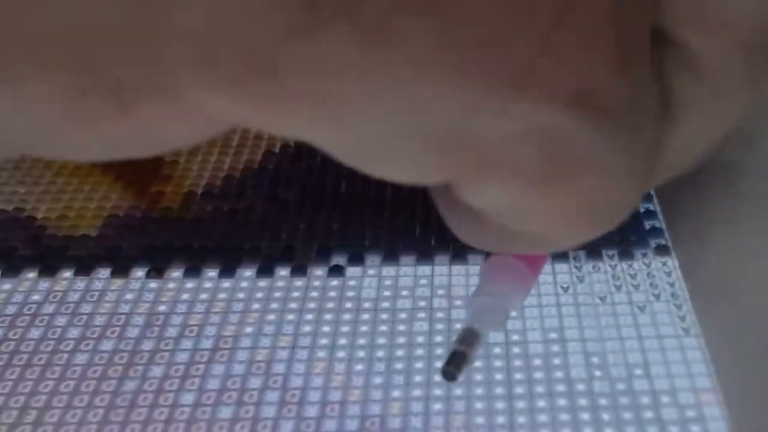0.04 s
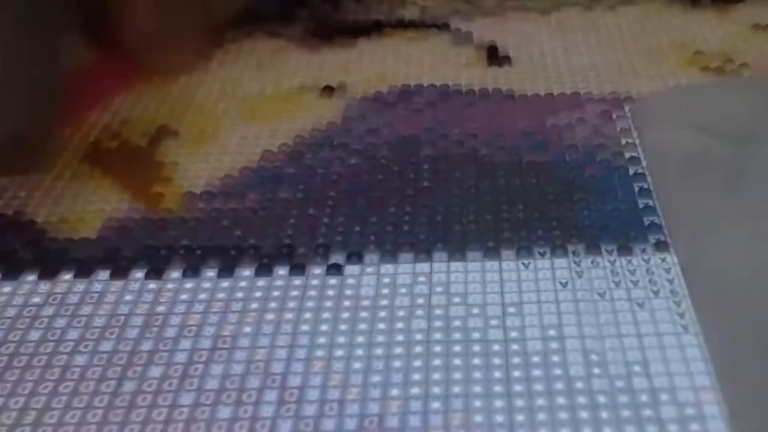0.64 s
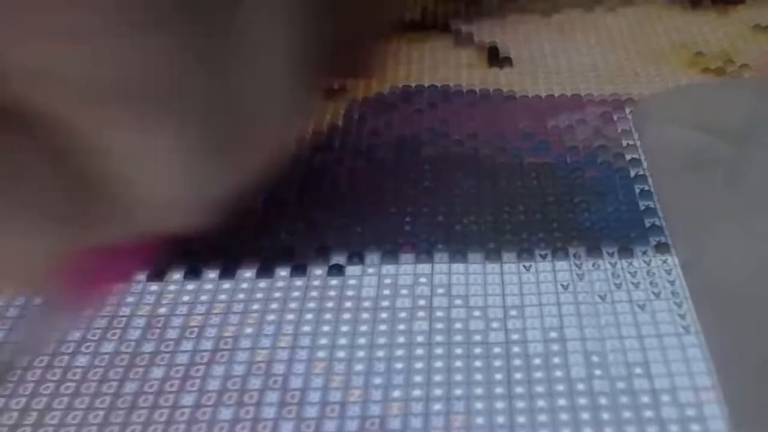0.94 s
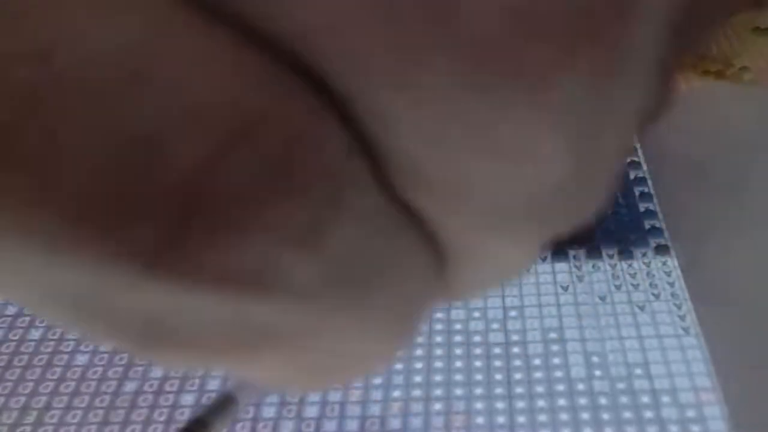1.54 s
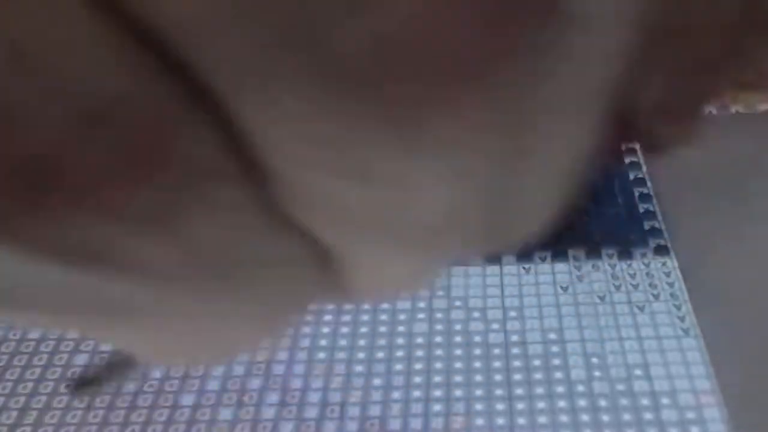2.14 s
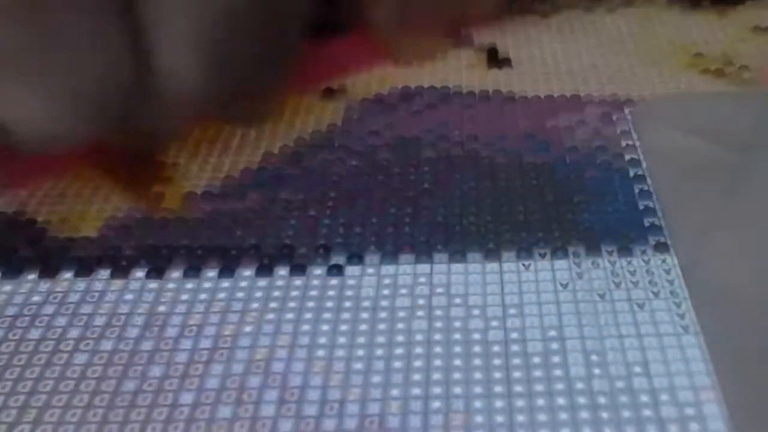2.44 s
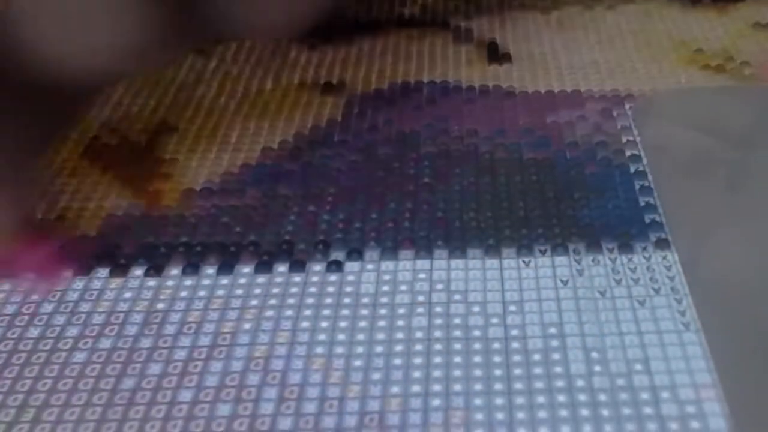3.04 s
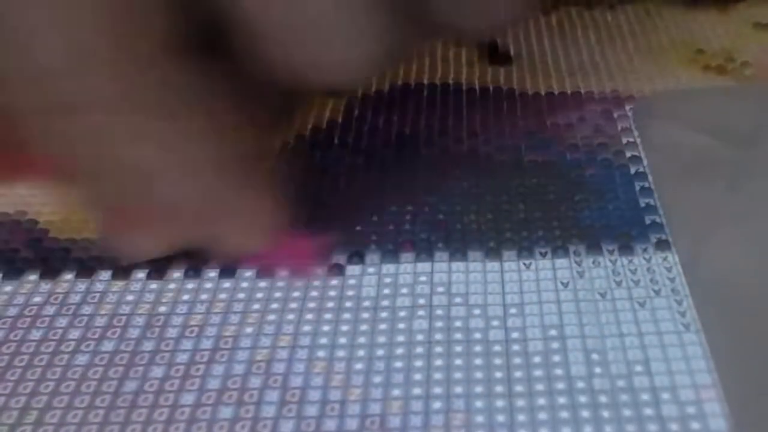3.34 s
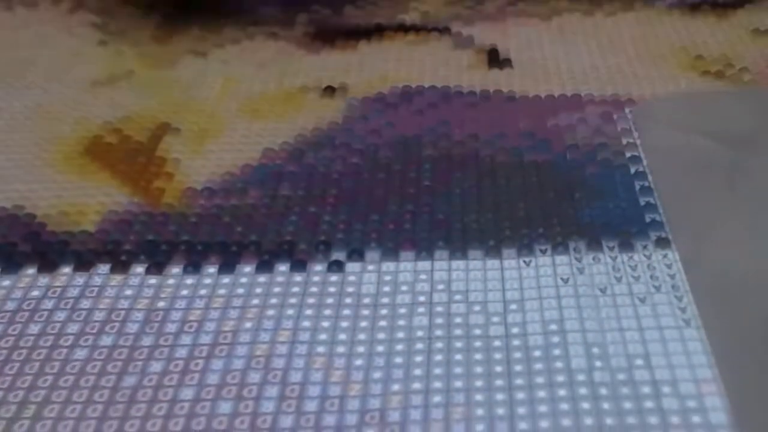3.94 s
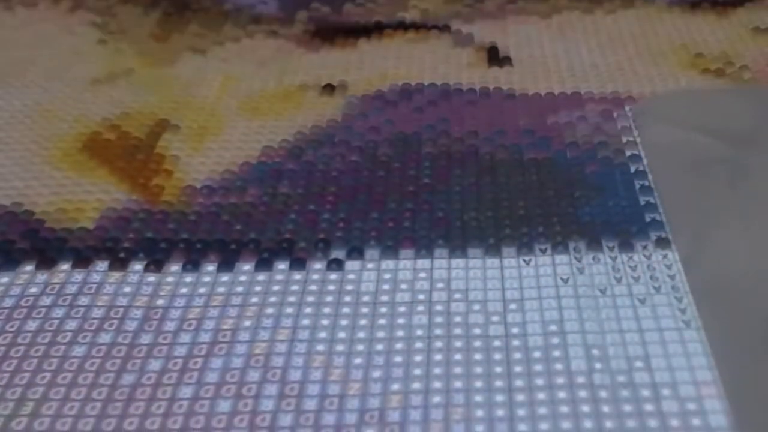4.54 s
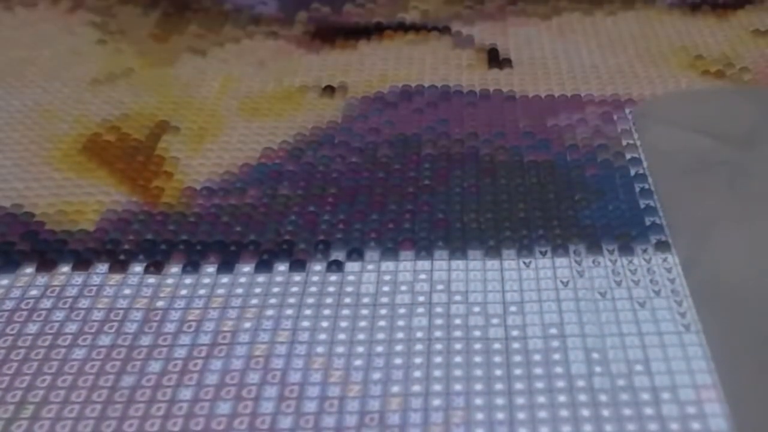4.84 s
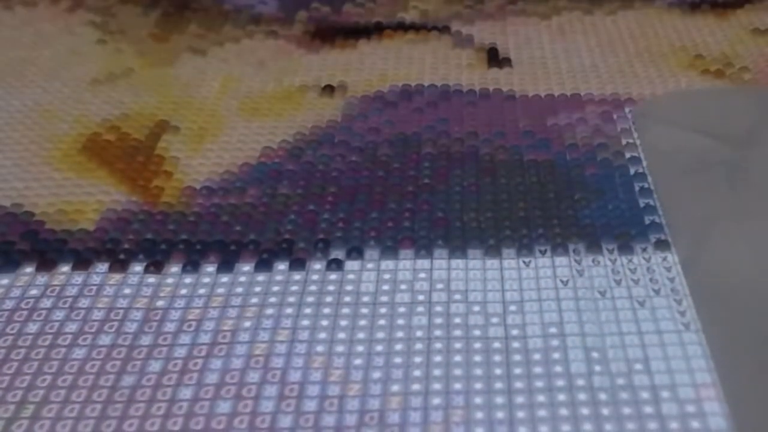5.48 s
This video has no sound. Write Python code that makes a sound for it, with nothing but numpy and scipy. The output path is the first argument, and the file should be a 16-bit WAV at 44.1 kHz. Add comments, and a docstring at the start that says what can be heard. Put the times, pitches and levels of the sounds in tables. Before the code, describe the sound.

Short dry rasps and scattered snaps as a hand and a plastic straightedge press beads on canvas, the table rumbling softly beneath.

```python
"""A hand and then a plastic straightedge rub over rows of tiny resin beads on a canvas, in a quiet room.
Each stroke is a dense stream of small slips: they rasp in the beads and make the tabletop below drone.
A thin squeak opens the first stroke, a plastic pen taps down once and the straightedge creaks briefly.
Now and then a bead snaps into its seat. Soft air noise and a faint fan hum lie underneath."""
import sys
import numpy as np
from scipy import signal
from scipy.fft import rfft, irfft, next_fast_len
from scipy.io import wavfile
from scipy.ndimage import uniform_filter1d, map_coordinates

SR = 44100
rng = np.random.default_rng(int(sys.argv[2]) if len(sys.argv) > 2 else 0)


def persist_wave(psi):
    """Save psi, clipped to +-1, as 16-bit WAV."""
    counts = np.round(np.clip(psi, -1, 1) * 32767).astype(np.int16)
    wavfile.write(sys.argv[1], SR, np.atleast_2d(counts).T)


N = 242991

# Strokes over the beads. Each row: start, rise, hold and fall in seconds; swell from start to end in dB;
# levels of rasp, hollow body, fizz, low drone and upper drone in dB; hollow resonance in Hz; its lift
# in dB; the touch ("hand", or the straightedge: a light "skim" or pressed on its "edge").
STROKES = [ (-0.07, 0.51, 0.17, 0.13, 4.5, -57, -61, -71, -44.5, -45.5, 1310, 6, "hand"),
           (0.489, 0.061, .1, 0.058, 6.5, -64, -59, -85, -60, -56.5, 940, 11, "hand"),
           (0.764, .11, 0.21, 0.12, -6, -49, -52, -64.5, -40.5, -43.5, 890, 4, "hand"),
           (1.088, 0.081, 0.0074, 0.11, -36, -57.5, -64.5, -78.5, -33, -65, 830, -17, "hand"),
           (1.306, 0.074, .004, .085, 0, -72, -62.5, -84.5, -62, -65, 780, 21, "hand"),
           (1.483, 0.07, 0.07, 0.17, 0, -67.5, -77.5, -85, -64, -77, 890, 3, "hand"),
           (2.061, 0.13, 0.067, 0.24, 8, -55.5, -63, -70, -54, -49.5, 960, 2, "hand"),
           (2.115, 0.22, 0.13, 0.24, 7.5, -53, -54, -69, -37.5, -38.5, 960, 1, "hand"),
           (2.493, 0.061, 0.021, 0.2, -3, -57.5, -52.5, -74.5, -46, -43, 1350, 9, "hand"),
           (2.687, 0.098, 0.023, 0.045, -8, -60.5, -60, -71, -47, -61.5, 1047, 16, "skim"),
           (2.756, 0.12, 0.13, .14, 16.5, -44.5, -50.5, -55, -59, -57.5, 920, 2, "skim"),
           (3.173, 0.12, 0.19, 0.19, 2, -49, -50, -59.5, -46.5, -51, 1260, 11.5, "skim"),
           (3.25, .02, 0.043, 0.032, -3, -60, -64, -62.5, -52, -52, 1270, 9, "skim"),
           (3.496, 0.04, 0.32, 0.42, -16.5, -62.5, -73.5, -73, -48.5, -58, 1090, 6, "skim"),
           (3.658, .2, 0.48, 0.16, -1.5, -49.5, -53, -60.5, -39.5, -42, 1130, -1, "edge"),
           (4.48, 0.22, 0.23, 0.15, 3, -45, -45.5, -53.5, -31.5, -39, 830, 8.5, "edge"),
           (4.929, 0.024, 0.006, 0.1, 4, -57, -41, -74, -45, -48, 523, 13, "edge"),
           (5.067, 0.11, 0.2, 0.11, -5, -60.5, -65.5, -70.5, -67, -53, 573, 21.5, "edge"),
           (5.114, 0.16, 0.35, 0.076, 4.5, -53.5, -55, -62, -56, -38.5, 860, 7, "edge")]
# Beads snapping into place. Each row: time in seconds, bright crack in dB, duller clack in dB.
SNAPS = [(2.4619, -46, -36), (2.842, -55, -62), (2.8766, -40, -45), (2.886, -47, -48), (3.212, -60, -63),
         (3.2668, -45, -48), (3.271, -48, -41.5), (3.3069, -54, -54), (3.826, -41, -39.5),
         (3.8329, -34, -31), (3.91, -34, -36.5), (3.926, -31.5, -27.5), (4.811, -33.5, -34),
         (4.8852, -37, -36), (4.9104, -15.5, -27.5), (5.32, -57, -32.5)]


def amp(db):
    """Turn decibels into a factor to multiply by."""
    return 10 ** (np.asarray(db) / 20)


def unit(x):
    """Scale a signal to an average strength (rms) of 1."""
    return x / np.sqrt(np.mean(x ** 2) + 1e-20)


def along(points, hz):
    """Read between (Hz, value) points on a logarithmic frequency axis."""
    point_hz, values = np.transpose(points)
    return np.interp(np.log(hz + 1), np.log(point_hz), values)


def curves(rows):
    """Join the rows of a timed table: one curve for each column after the time."""
    times, *columns = np.transpose(rows)
    return [np.interp(np.arange(N) / SR, times, column) for column in columns]


def during(rows):
    """1 while a timed table lasts, 0 outside, with soft ends."""
    t = np.arange(N) / SR
    return uniform_filter1d(((t >= rows[0][0]) & (t <= rows[-1][0])) * 1.0, size=1600)


def wobble(rate):
    """A smooth curve through `rate` random values a second."""
    return unit(map_coordinates(rng.standard_normal(N // 8), [np.arange(N) * rate / SR], mode="wrap"))


def filtered(x, response):
    """Multiply each frequency in x by response(hz)."""
    size = next_fast_len(N + SR // 2)
    return irfft(rfft(x, size) * response(np.fft.rfftfreq(size, 1 / SR)), size)[:N]


def coloured(x, colour):
    """Shape the tone of x with a table of (Hz, dB) points."""
    return filtered(x, lambda hz: amp(along(colour, hz)))


def band_rms(x, low_hz, high_hz):
    """Running strength of x between two frequencies."""
    band = filtered(x, lambda hz: (hz > low_hz) & (hz < high_hz))
    return np.sqrt(np.abs(uniform_filter1d(band ** 2, size=4000))) + 1e-12


def ring(x, modes):
    """Let x shake damped resonances (modes), added with alternating signs."""
    return filtered(x, lambda hz: sum(
        (-1) ** k * amp(db) * 1j * hz * width / (centre ** 2 - hz ** 2 + 1j * hz * width)
        for k, (centre, width, db) in enumerate(modes)))


def sustained(x, seconds):
    """Hold the strength of x near 1, averaged over the given time."""
    power = np.abs(uniform_filter1d(x ** 2, max(int(seconds * SR), 50)))
    return x / np.sqrt(power + 1e-3 * np.mean(x ** 2))


def room_tone():
    """Soft air noise with a slightly unsteady fan hum."""
    # The air's tone. Each row: frequency in Hz, relative level in dB.
    air_colour = [(15, -67), (25, -29), (33, -16), (107, -11), (269, -15), (486, -21.5), (542, -19.5),
                  (620, -23), (1280, -27), (3880, -44.5), (15800, -53)]
    # The fan's tones. Each row: pitch in Hz, level in dB.
    fan_tones = [(264, -88), (533, -79.5)]
    air = amp(-72) * unit(coloured(rng.standard_normal(N), air_colour))
    return air + sum(amp(db) * unit(np.sin(2 * np.pi * np.cumsum(hz + 3 * wobble(5)) / SR))
                     for hz, db in fan_tones)


def slips(per_second, row_rate, row_db):
    """Tiny slips of random size, stronger and weaker as the contact crosses rows of beads."""
    hits = rng.random(N) < per_second / SR
    return unit(hits * rng.standard_normal(N) * amp(row_db * wobble(row_rate)))


def gesture(start, rise, hold, fall, swell_db):
    """A stroke's strength: it speeds up, swells or fades, and slows to a faint creep."""
    steepness, creep_db, creep_s = 3.42, -37.5, 0.076
    t, length = np.arange(N) / SR - start, rise + hold + fall
    speed = np.sin(np.pi / 2 * np.clip(np.minimum(t / rise, (length - t) / fall), 0, 1))
    creep = amp(creep_db) * np.exp(-((t - np.clip(t, rise / 2, length)) / creep_s) ** 2)
    swell = amp(swell_db * (np.clip(t / length, 0, 1) - 0.5))
    return np.hypot(speed ** steepness, creep) * swell


def hollow_grip(x, patchy_db):
    """The grip lifts a hollow resonance that glides from stroke to stroke; smaller ones come and go."""
    hz, t, spectrum = signal.stft(x, SR, nperseg=1024)
    times, centre_hz, lift_db = np.transpose(
        [(start + rise + hold / 2, centre, lift) for start, rise, hold, *_, centre, lift, _ in STROKES])
    octaves = np.log2((hz[:, None] + 1) / np.interp(t, times, centre_hz))
    hollow_db = np.interp(t, times, lift_db) * np.exp(-(octaves / 0.17) ** 2)
    blur = np.outer(np.hanning(8), np.hanning(14))
    patches = unit(signal.fftconvolve(rng.standard_normal(spectrum.shape), blur, "same"))
    depth_db = patchy_db / (1 + hz[:, None] / 8000)  # the far treble stays smooth
    return signal.istft(spectrum * amp(hollow_db + depth_db * patches), SR, nperseg=1024)[1][:N]


def bead_rasp(kind, colour, contact):
    """Slips heard through canvas and beads; each stroke has its own mix of rasp, hollow body and fizz."""
    friction = coloured(contact, colour)
    body = filtered(friction, lambda hz: 1 / (1 + (hz / 1880) ** 8))
    fizz = filtered(friction, lambda hz: 1 - 1 / (1 + (hz / 5700) ** 8))
    bands = [(friction - body - fizz) / band_rms(friction, 2000, 7000),
             body / band_rms(friction, 500, 1600),
             fizz / band_rms(friction, 8000, 15500)]
    power = 0
    for start, rise, hold, fall, swell_db, rasp_db, body_db, fizz_db, *_, touch in STROKES:
        if touch == kind:
            strength = gesture(start, rise, hold, fall, swell_db)
            power += np.outer(amp([rasp_db, body_db, fizz_db]), strength) ** 2
    return np.sum(np.sqrt(power) * bands, axis=0)


def rubbing():
    """Skin brushes the beads softly and sounds the grip; plastic scrapes them with a harder grain."""
    # The tone of each kind of touch. Each row: frequency in Hz, relative level in dB.
    hand_colour = [(320, -5), (470, -2.5), (560, -5), (680, -1), (1000, -1), (1700, -5), (3000, -13),
                   (4600, -17.5), (6500, -15.5), (8000, -22), (10000, -20.5), (15800, -27)]
    skim_colour = [(240, -15), (400, -5), (489, -13), (570, -9.5), (665, -15), (904, -2), (1160, -15),
                   (1310, -8), (2170, -7.5), (2350, -12), (2910, -2.5), (5640, -3.5), (15800, -18.5)]
    edge_colour = [(290, -5), (370, 7), (450, -6.5), (560, -3), (675, -8), (820, -0.5), (1200, 1),
                   (1650, -3.5), (2300, -0.5), (3500, 5), (7000, -12), (8200, -19.5), (11400, -21),
                   (15800, -25)]
    # Resonances of the hand and the pen it holds. Each row: pitch in Hz, width in Hz, gain in dB.
    grip_modes = [(2050, 100, -10), (2910, 450, -3.5), (3920, 530, 0.5), (5220, 440, -4), (6330, 500, -4.5)]
    skin = hollow_grip(slips(per_second=9000, row_rate=330, row_db=0.5), patchy_db=6.0)
    skin = skin + sum(ring(skin, [mode]) for mode in grip_modes)
    plastic = hollow_grip(slips(per_second=10000, row_rate=200, row_db=1.0), patchy_db=4.5)
    wavering = amp(-0.2 * wobble(25))
    return wavering * (bead_rasp("hand", hand_colour, skin)
                       + bead_rasp("skim", skim_colour, plastic)
                       + bead_rasp("edge", edge_colour, plastic))


def shaking():
    """How hard the strokes and shoves shake the tabletop's low and upper resonances."""
    # The fingers bear down and the board booms.
    # Each row: time and half length in seconds, low drone and upper drone in dB.
    shoves = [(0.31, .055, -34, -52.5), (0.377, 0.023, -41.5, -35), (0.455, 0.049, -27.5, -48),
              (0.637, 0.03, -33.5, -44), (0.988, 0.023, -23, -37.5), (1.075, 0.046, -27.5, -44),
              (1.18, 0.022, -34.5, -62), (1.396, 0.021, -41.5, -70), (2.149, 0.031, -40, -67),
              (2.395, 0.069, -30.5, -46), (2.505, 0.068, -34, -35.5), (3.054, 0.05, -45.5, -51.5),
              (3.295, 0.03, -45, -42), (3.403, 0.019, -36.5, -49), (3.924, 0.056, -25.5, -28.5),
              (4.096, .025, -33, -40.5), (4.218, 0.026, -24, -50), (4.27, 0.03, -30.5, -62),
              (4.375, .035, -41, -39), (4.65, 0.039, -27, -60), (4.778, 0.031, -34, -30),
              (4.896, 0.079, -30, -28), (5.003, 0.04, -30, -43.5), (5.298, 0.071, -31.5, -35),
              (5.432, 0.047, -27, -30.5)]
    low_lag_s, upper_lag_s = 0.011, 0.015  # the drone builds up and dies after the rasp
    t, low_power, upper_power = np.arange(N) / SR, 0, 0
    for start, rise, hold, fall, swell_db, _, _, _, low_db, upper_db, *_ in STROKES:
        low_power += (amp(low_db) * gesture(start + low_lag_s, rise, hold, fall, 0)) ** 2
        upper_power += (amp(upper_db) * gesture(start + upper_lag_s, rise, hold, fall, swell_db)) ** 2
    low_power *= amp(2.0 * wobble(26)) ** 2  # uneven finger pressure
    for time, half_length, low_db, upper_db in shoves:
        push = np.exp(-((t - time) / half_length) ** 2)
        low_power += (amp(low_db) * push) ** 2
        upper_power += (amp(upper_db) * push) ** 2
    return np.sqrt(low_power), np.sqrt(upper_power)


def tabletop():
    """Bumping over the beads shakes the board into a low drone."""
    # The board's resonances. Each row: pitch in Hz, width in Hz, relative level in dB.
    low_modes = [(85, 130, -66.5), (117.4, 6.77, 6.5), (131.2, 19.7, -9)]
    upper_modes = [(168.4, 45, 4.5), (225.5, 21.1, 2), (259.3, 32.4, -2), (310.3, 24.6, 1),
                   (361, 187, -12.5)]
    # The place of contact favours some upper resonances. Each row: time in seconds, favoured pitch in Hz.
    focus = [(0.3, 259), (2.5, 248), (3.6, 268), (4.0, 264), (4.2, 212), (4.65, 240), (4.8, 200),
             (4.95, 199.5), (5.3, 219), (5.48, 252)]
    low_gain, upper_gain = shaking()
    favoured_hz, = curves(focus)
    soften = lambda x, corner_hz: filtered(x, lambda hz: 1 / (1 + (hz / corner_hz) ** 4))
    low = ring(soften(slips(per_second=920, row_rate=40, row_db=0.5), corner_hz=196), low_modes)
    bumps = soften(slips(per_second=1200, row_rate=20, row_db=11.0), corner_hz=660)
    favour = lambda hz: 1 / (1 + (np.log2(hz / favoured_hz) / 0.36) ** 2)
    upper = sum((-1) ** k * favour(mode[0]) * ring(bumps, [mode]) for k, mode in enumerate(upper_modes))
    drone = low_gain * sustained(low, seconds=0.029) + upper_gain * sustained(upper, seconds=0.0296)
    return filtered(drone, lambda hz: hz ** 2 / (hz ** 2 + 48 ** 2))  # a small board gives little bass


def squeak():
    """A thin friction whistle rises as the hand starts to slide."""
    # The whistle's path. Each row: time in seconds, pitch in Hz, level in dB.
    glide = [(0, 5840, -102), (0.04, 6160, -95), (0.08, 6600, -82), (0.13, 6640, -80), (0.19, 6600, -76),
             (0.27, 6700, -94)]
    pitch_hz, db = curves(glide)
    phase = 2 * np.pi * np.cumsum(pitch_hz * (1 + 0.0066 * wobble(407))) / SR
    return during(glide) * amp(db + 1.2 * wobble(60)) * unit(np.sin(phase))


def pen_tap():
    """A hard contact cracks and briefly rings the pen's plastic barrel."""
    # The pen taps down and settles. Each row: start in seconds, level in dB.
    taps = [(1.635, -43.5), (1.645, -55)]
    # The barrel's tones. Each row: pitch in Hz, relative level in dB, seconds to fade by 60 dB.
    barrel_modes = [(980, 1, 0.018), (1450, 1.5, 0.017), (1850, -0.5, 0.029), (2604, 4, 0.042),
                    (3630, -9, 0.043), (4740, 5.5, 0.01), (6660, -16, 0.08)]
    crack_band = signal.butter(1, [800, 7000], "band", fs=SR)
    sound, t = np.zeros(N), np.arange(SR // 5) / SR
    for start, db in taps:
        barrel = sum(amp(level - 60 * t / fade_s) * np.sin(2 * np.pi * (hz * t + rng.random()))
                     for hz, level, fade_s in barrel_modes)
        contact = amp(-60 * t / 0.02) + amp(-11 - 60 * t / 0.15)
        crack = signal.lfilter(*crack_band, rng.standard_normal(len(t))) * contact
        sound[round(start * SR):][:len(t)] += amp(db - 1.5) * (barrel + crack)
    return sound


def snap_bursts(levels_db, colour, rise_s, fade_s, tail_db, tail_s):
    """A short burst of noise for each snap, then a weak rattle of the neighbouring beads."""
    t = np.arange(SR // 8) / SR
    attack = np.minimum(t / rise_s, 1) ** 2
    burst = amp(-60 * np.maximum(t - rise_s, 0) / fade_s)
    rattle = amp(tail_db - 60 * t / tail_s)
    envelope = np.zeros(N + SR)
    for (start, _, _), db in zip(SNAPS, levels_db):
        envelope[round(start * SR):][:len(t)] += amp(db) * attack * (burst + rattle)
    return envelope[:N] * sustained(coloured(rng.standard_normal(N), colour), seconds=0.0023)


def crackle(spread_s, cap_db, offset_db):
    """The neighbours of a snapping bead shift too: a brief cluster of tiny bright ticks."""
    t = np.arange(N) / SR
    envelope = sum(amp(min(db, cap_db) + offset_db) * np.exp(-((t - time) / spread_s) ** 2)
                   for time, db, _ in SNAPS)
    ticks = ring(slips(per_second=900, row_rate=90, row_db=3), [(9800, 1660, -8), (13900, 2700, 3)])
    return envelope * sustained(ticks, seconds=0.022)


def bead_snaps():
    """A bead seats with a bright crack and a duller clack of the plastic on it."""
    # The tone of the two parts. Each row: frequency in Hz, relative level in dB.
    crack_colour = [(2000, -28), (4500, -3), (8000, -2), (11000, 9.5), (14000, 1), (17000, 3)]
    clack_colour = [(400, -30), (900, -1.5), (1500, 5.5), (2800, 7.5), (6500, 3.5), (8500, -5.5),
                    (16000, -32)]
    _, crack_db, clack_db = np.transpose(SNAPS)
    crack = snap_bursts(crack_db, crack_colour, rise_s=0.0011, fade_s=0.0078, tail_db=-41, tail_s=0.035)
    clack = snap_bursts(clack_db, clack_colour, rise_s=0.0025, fade_s=0.013, tail_db=-14, tail_s=0.02)
    return crack + clack + crackle(spread_s=0.012, cap_db=-32, offset_db=-18)


def creak():
    """The plastic edge sticks and slips as it takes hold, ringing with sparse ticks."""
    # The creak's rise and fall. Each row: time in seconds, level in dB.
    levels = [(3.19, -74.5), (3.24, -59), (3.265, -55), (3.308, -47), (3.34, -52), (3.37, -70)]
    ticks = ring(slips(per_second=260, row_rate=20, row_db=-10), [(6200, 580, 2.5), (9900, 1500, -12.5)])
    return during(levels) * amp(curves(levels)[0]) * sustained(ticks, seconds=0.061)


def walls(x):
    """The small room's short echo; the treble dies before the bass."""
    # How long the room rings. Each row: frequency in Hz, seconds to fade by 60 dB.
    fade_times = [(150, 0.14), (1500, 0.094), (6000, 0.022), (15000, 0.053)]
    hz, t, spectrum = signal.stft(rng.standard_normal(SR // 2), SR, nperseg=256)
    tail = signal.istft(spectrum * amp(-60 * t / along(fade_times, hz)[:, None]), SR, nperseg=256)[1]
    delayed = np.pad(x, (300, 0))
    return signal.fftconvolve(delayed, tail / np.linalg.norm(tail))[:N]


def scene():
    """The sounds on the beads with a little echo, over the tabletop's drone and the quiet room."""
    beads = rubbing() + bead_snaps() + squeak() + creak() + pen_tap()
    return (beads + amp(-14) * walls(beads) + tabletop() + room_tone())[None]


def record(dry):
    """Cut away the very highest treble."""
    return filtered(dry[0], lambda hz: hz < 15850)[None]


dry = scene()
out = record(dry)
persist_wave(out)
```